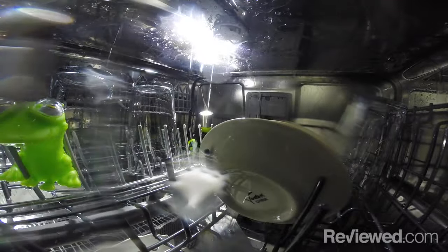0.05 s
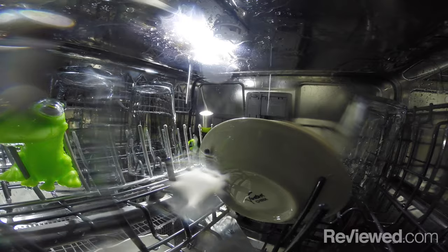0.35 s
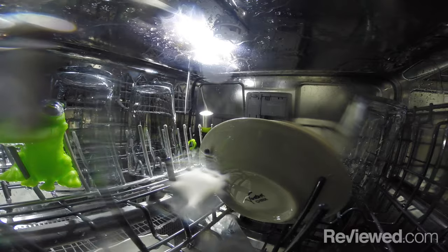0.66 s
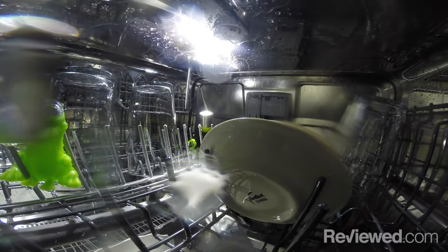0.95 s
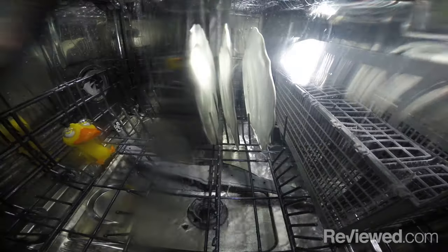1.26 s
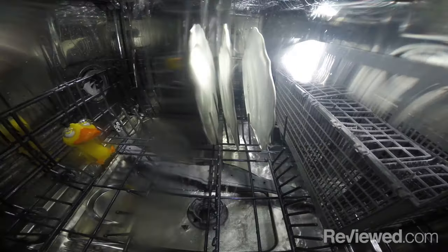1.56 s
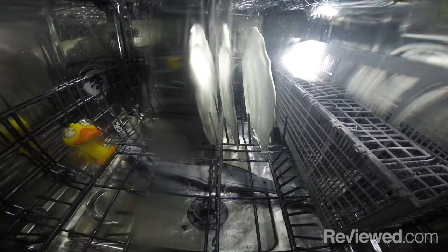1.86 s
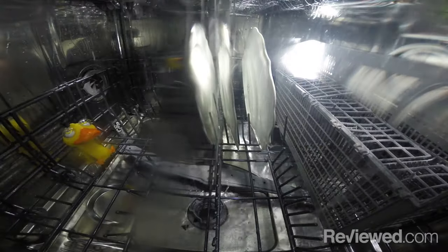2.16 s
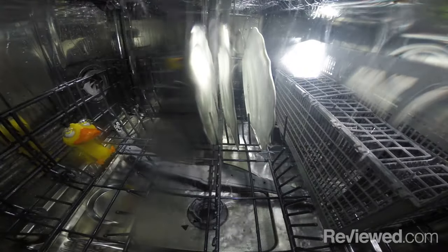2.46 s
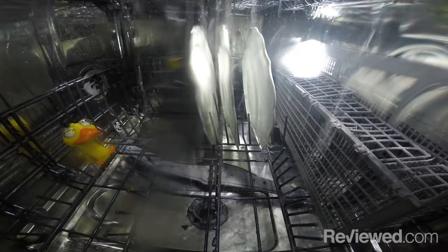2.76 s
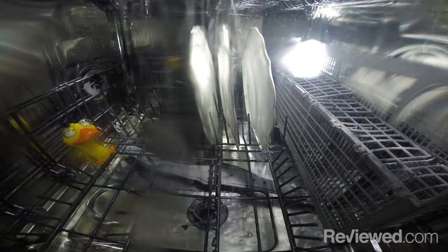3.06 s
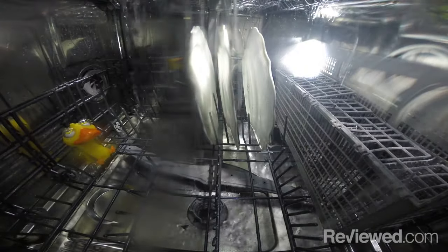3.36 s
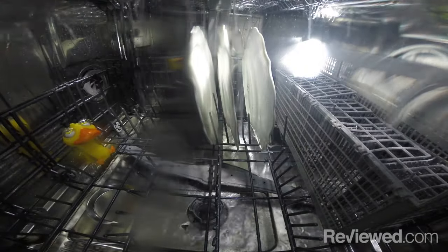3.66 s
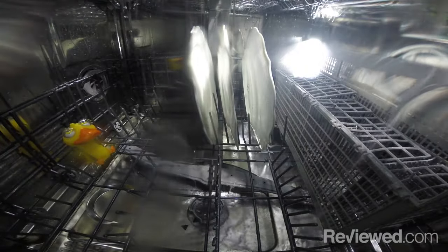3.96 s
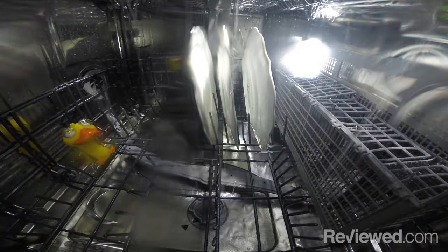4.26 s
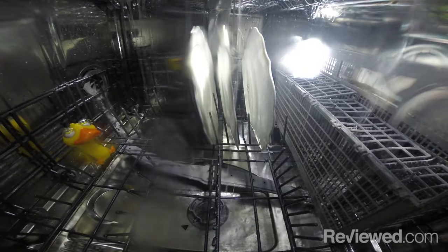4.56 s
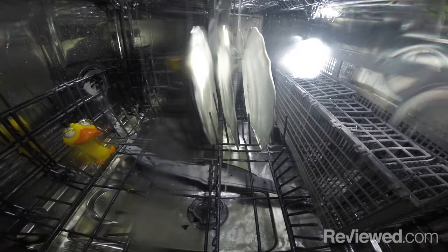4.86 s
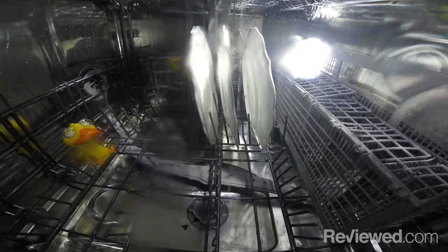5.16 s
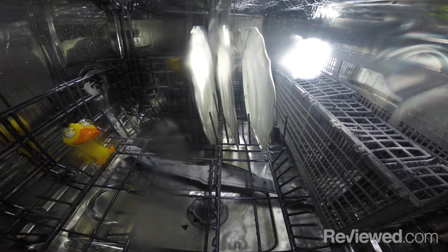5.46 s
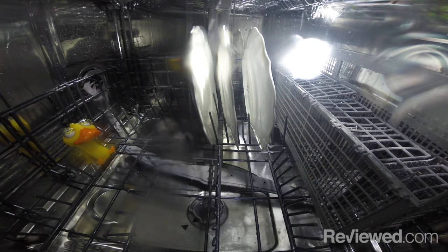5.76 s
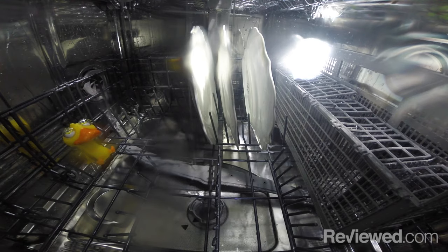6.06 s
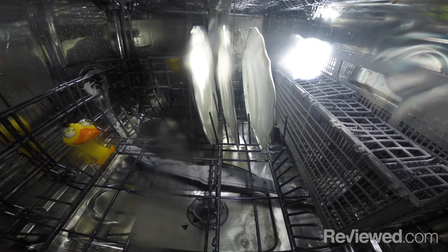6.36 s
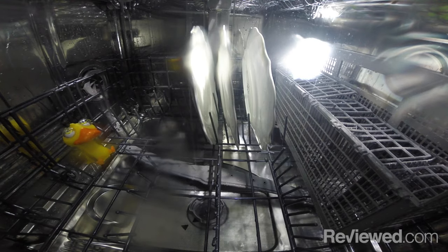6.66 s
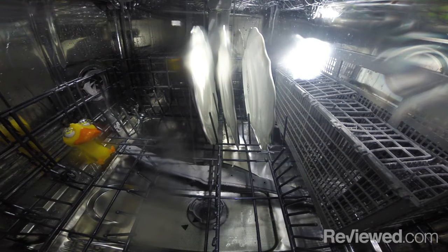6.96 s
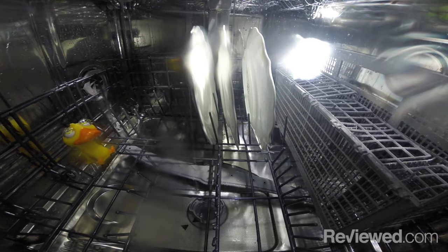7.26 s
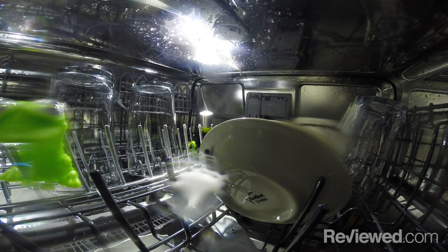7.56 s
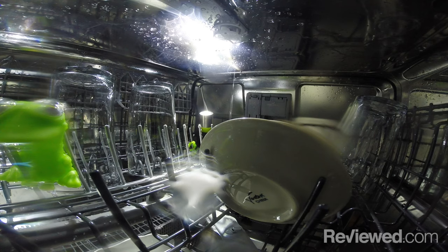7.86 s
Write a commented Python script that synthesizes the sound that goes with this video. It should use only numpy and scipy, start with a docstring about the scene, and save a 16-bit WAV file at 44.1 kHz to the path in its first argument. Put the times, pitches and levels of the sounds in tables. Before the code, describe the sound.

Heard from within a dishwasher's steel tub, pulses of spray thud and rattle against the walls amid fizzy splashes and bright drips. After the strongest run of pulses, the spraying stops and the sound drops to quieter trickling and pattering. Occasional drops plink into standing water with a short metallic ring, while the pump's low drone slowly weakens underneath.

```python
"""Inside a running dishwasher. From the start, jets from the turning spray arm sweep the steel walls and
make them drum and rattle, while thrown water splashes, patters and drips in the ringing tub. At 2.5 s
the jets dig in for their longest volley; from 3.5 s they die away. That leaves trickles, thinning
splashes and a few plinks into the sump over the low, fading drone of the pump."""
import sys
import numpy as np
from scipy import signal
from scipy.fft import rfft, irfft
from scipy.io import wavfile
from scipy.ndimage import uniform_filter1d

SR = 44100
rng = np.random.default_rng(int(sys.argv[2]) if len(sys.argv) > 2 else 0)


def inscribe(sig):
    """Save sig as 16-bit PCM at rate SR to the path in sys.argv[1].

    A 1-D sig is mono; a 2-D sig holds one channel per row.
    Samples are clipped to [-1, 1] before scaling.
    """
    pcm = np.round(np.clip(np.atleast_2d(sig).T, -1, 1) * 32767)
    wavfile.write(sys.argv[1], SR, pcm.astype(np.int16))


N = 353152
TIME = np.arange(N) / SR
JETS_STOP_S, JETS_GONE_S, USUAL_LOAD_DB = 3.5, 4.25, -35

# how hard the jets lean on the nearby walls: (time [s], load [dB])
JET_LOAD = [(0, -34.5), (0.2, -32.5), (0.3, -37.5), (0.57, -38), (0.72, -42), (0.94, -39), (1.15, -49),
            (1.36, -43), (1.63, -37), (1.84, -46.5), (2.0, -40.5), (2.95, -29.5), (3.2, -31.5),
            (3.47, -31.5), (3.67, -48.5), (4.2, -66)]
# even volleys of jet passes: (first pass [s], last pass [s], passes [count], level at usual load [dB])
JET_VOLLEYS = [(0.024, 0.399, 5, -42.5), (0.513, 0.512, 1, -43.5), (0.805, 0.807, 1, -38.5),
               (1.45, 1.612, 2, -43.5), (1.91, 1.909, 1, -38.5), (2.008, 2.169, 3, -37.5),
               (2.275, 2.369, 2, -41), (2.456, 3.481, 14, -43)]
def jet_force(lag_s=0.012, half_width_s=0.022, spread_db=1.3, follows_load=0.68):
    """The driving envelope: each pass of a jet is a quick swell, harder under a higher load."""
    power = np.zeros(N)
    for first, last, passes, db in JET_VOLLEYS:
        for s in np.linspace(first, last, round(passes)):
            swell = np.exp(-np.minimum(((TIME - s - lag_s) / half_width_s) ** 2, 50))
            power += from_db(db + spread_db * rng.standard_normal()) ** 2 * swell
    return np.sqrt(power) * from_db(follows_load * (curve(JET_LOAD) - USUAL_LOAD_DB))


# sub rumble of the cabinet: (frequency [Hz], width [Hz], gain [dB])
CABINET_MODES = [(28.2, 8.6, 1), (64.9, 14, 1.5), (94.2, 17.3, -10)]
# hollow hum of the wall panels: (frequency [Hz], width [Hz], gain [dB])
PANEL_MODES = [(141.5, 12.5, -8), (173.8, 20.6, 4), (181.8, 28.5, 2), (206, 15, -2.5), (225, 40.5, -9.5),
               (254.1, 25, -8), (298.2, 13.1, -15.5)]
# broad thud of a direct hit on the wall: (frequency [Hz], width [Hz], gain [dB])
THUD_MODES = [(57.4, 45, 2), (137.4, 70, -7.5), (279, 73, -7)]
def drumming(force, throb=0.81, soft_hz=235, rumble_db=-38.5, settle_db_per_s=35.5, thud_db=3.5):
    """Jets pound the tub: each pass thuds, the panels hum, and the cabinet rumbles and settles slowly."""
    load_db, run_down_db = curve(JET_LOAD), settle_db_per_s * TIME
    held_db = np.maximum.accumulate(load_db + run_down_db) - run_down_db  # instant attack, slow release
    rumble = from_db(rumble_db + 0.93 * (held_db - USUAL_LOAD_DB))
    pressure = np.interp(TIME, [JETS_GONE_S - .4, JETS_GONE_S], [1, 0])
    mean_force = uniform_filter1d(force, SR // 8) + from_db(-56)
    beat = steady(1 + throb * force / mean_force, span_s=0.17)
    cabinet = steady(body(impacts(per_s=900, spread_db=2.0), CABINET_MODES), span_s=0.064)
    soften = signal.butter(4, soft_hz, fs=SR, output="sos")
    soft_drops = signal.sosfilt(soften, impacts(per_s=700, spread_db=0))
    panels = steady(body(soft_drops, PANEL_MODES), span_s=0.11)
    thud = steady(body(impacts(per_s=1000, spread_db=-0.5), THUD_MODES), span_s=0.095)
    hum = from_db(load_db - 1.14) * beat * panels
    return pressure * (rumble * cabinet + hum) + from_db(thud_db) * force * thud


# metallic mids of the steel under a jet: (frequency [Hz], width [Hz], gain [dB])
STEEL_MODES = [(406, 1130, -34), (457.2, 46.5, 2.5), (540, 69, -31), (703, 95, -8), (894, 180, -16),
               (1084, 99, -10), (1300, 120, -18), (1675, 190, -12.5), (2080, 56, -15), (2460, 180, -18),
               (3180, 150, -18.5)]
def jet_rattle(force, stray_db=-21.5):
    """A jet is a stream of hard drops on steel; stray spray fills the gaps between passes."""
    stray = from_db(stray_db + curve(JET_LOAD)) * np.interp(TIME, [JETS_STOP_S, JETS_GONE_S], [1, 0])
    rattle = steady(body(impacts(per_s=1200, spread_db=-4.5), STEEL_MODES), span_s=0.01)
    return rattle * np.hypot(from_db(-6.0) * force, stray)


# big gouts on dishes and racks: (time [s], fizz level [dB], fizz centre [Hz], gulp level [dB])
BIG_GOUTS = [(0.0774, -36, 5450, -55), (0.4125, -43.5, 4400, -36.5), (0.445, -38, 4860, -54),
             (0.698, -38.5, 4840, -75), (0.848, -39.5, 4370, -53), (0.9316, -38, 5140, -66),
             (1.3758, -37.5, 5150, -52.5), (1.514, -39.5, 5960, -62), (1.54, -38.5, 4570, -54),
             (1.5953, -40.5, 4550, -65), (1.7241, -38, 4700, -47), (1.9733, -49, 4560, -40.5),
             (2.0428, -31.5, 4560, -41.5), (2.3218, -43, 5630, -69), (2.797, -37.5, 5530, -70),
             (3.2444, -40.5, 4750, -60.5), (3.3752, -39, 5240, -63), (3.4326, -39.5, 5160, -48),
             (3.6011, -37.5, 3600, -41.5), (3.66, -45, 4300, -43), (3.7066, -46, 5400, -45.5),
             (3.7405, -41.5, 5250, -54), (3.897, -40, 4030, -60), (3.932, -39, 4970, -62),
             (4.1131, -45, 5300, -57), (4.2113, -47, 5630, -49), (4.3232, -52, 5300, -50),
             (4.4104, -51.5, 7760, -59), (4.7165, -45, 5140, -53), (4.8022, -46, 4460, -59),
             (4.9454, -48.5, 3620, -49.5), (5.0709, -43.5, 5550, -62), (5.3327, -49, 4800, -44.5),
             (5.446, -58, 3630, -49.5), (5.7694, -72, 6090, -52.5), (6.1036, -50, 4730, -51.5),
             (6.3173, -50.5, 4800, -66), (6.8447, -54, 5600, -49), (6.9003, -46.5, 4050, -49.5),
             (7.7614, -52, 4400, -52.5)]
def splashes(gouts, t60=0.046, width_share=0.4, gulp_hz=2680, gulp_width_hz=1000, crack_db=-21):
    """A gout slaps down with a crack and a gulp, and bursts into a short fizz of tiny bubbles."""
    out, t = np.zeros(N), TIME[:SR // 3]
    for s, db, hz, gulp_db in gouts:
        burst = rng.standard_normal(len(t)) * from_db(-60 * t / t60)
        crack = from_db(crack_db) * resonate(burst, 7200, 4300)
        fizz = body(burst, [(hz, width_share * hz, 0)])
        gulp = body(burst, [(gulp_hz, gulp_width_hz, 0)])
        slap = from_db(db) * peak_one(fizz + crack) + from_db(gulp_db + 1.5) * peak_one(gulp)
        add(out, s - .001, tub(slap, wet_db=4.0, t60=0.26))
    return from_db(1.5) * out


# drips into standing water: (time [s], level [dB], bubble pitch [Hz])
DRIPS = [(0.2659, -35, 2080), (0.411, -36.5, 2380), (0.625, -36.5, 2080), (1.1208, -35, 2080),
         (1.1677, -44, 2080), (1.9335, -37, 2080), (1.9789, -46, 2080), (3.0205, -33.5, 2140),
         (3.776, -51, 1000), (4.1686, -47, 1170), (5.0314, -43.5, 2380), (5.1325, -32.5, 2070),
         (5.1617, -42.5, 1105), (5.2904, -43.5, 1027), (5.3293, -35.5, 2410), (7.631, -44, 1110),
         (7.7109, -47.5, 1104), (7.7785, -50, 2420)]
# glasses and plates ringing in sympathy: (frequency [Hz], width [Hz], gain [dB])
DISH_MODES = [(1074, 5.2, 13), (1232, 3.7, 20.5), (2090, 16, 11), (2230, 10, -6), (2410, 5.9, 16.5)]
def plinks(cycles=3.04, rise=0.008, t60_at_1khz=0.29, tap_db=-14):
    """A drop taps the water and traps a ringing bubble; the dishes answer, and low notes hang longer."""
    bubbles, drips, t = np.zeros(N), np.zeros(N), TIME[:SR // 3]
    for s, db, hz in DRIPS:
        age = t * hz / cycles
        swell = (age * np.exp(1 - age)) ** 2
        bend = 1 + rise * np.tanh(age - 1)
        bubble = from_db(db) * swell * np.sin(2 * np.pi * hz * t * bend)
        tap = resonate(rng.standard_normal(len(t)) * np.exp(-age), hz, hz)
        drip = bubble + from_db(db + tap_db) * peak_one(tap)
        add(bubbles, s - .001, bubble)
        add(drips, s - .001, tub(drip, wet_db=0, t60=t60_at_1khz * (1000 / hz) ** 0.89))
    dishes = sum(from_db(db) * resonate(bubbles, hz, width) for hz, width, db in DISH_MODES)
    return from_db(1.1) * (drips + dishes)


# heavy drops on the tub floor: (time [s], level [dB])
FLOOR_KNOCKS = [(1.127, -33), (1.163, -38), (1.406, -37.5), (6.659, -38.5)]
def knocks(t60=0.0095):
    """A heavy drop lands on sheet steel with a short, dull tap."""
    out, t = np.zeros(N), TIME[:SR // 3]
    for s, db in FLOOR_KNOCKS:
        burst = rng.standard_normal(len(t)) * from_db(-60 * t / t60)
        tap = body(burst, [(885, 710, -1.8), (1710, 620, -0.22)])
        add(out, s, from_db(db) * tub(peak_one(tap), wet_db=2.5, t60=0.28))
    return from_db(-4.5) * out


# fader ride for the water in the air: (time [s], level [dB])
AIRBORNE_FLOW = [(0.0, -63), (0.18, -67.5), (0.49, -68.5), (1.38, -68), (1.76, -72), (2.18, -68),
                 (3.3, -69), (3.54, -65.5), (3.74, -66), (4.14, -72.5), (4.97, -72), (5.17, -70.5),
                 (5.46, -74), (6.26, -77.5), (6.79, -76), (8.0, -76.5)]
def flow_swing():
    """How far the thrown water swells above or sinks below its mean, in dB."""
    db = curve(AIRBORNE_FLOW)
    return db - db.mean()


def small_splashes(per_s=5, spread_db=3, low_hz=3980, high_hz=6800):
    """Small gouts land at loosely even times, their fizz riding the flow."""
    jitter, size, pitch, gulp = rng.random((200, 4)).T
    s = (np.arange(len(jitter)) + jitter) / per_s
    fizz_db = -50 + 0.91 * np.interp(s, TIME, flow_swing()) + spread_db * (2 * size - 1)
    hz = low_hz * (high_hz / low_hz) ** pitch
    gulp_db = -56.5 + spread_db * (2 * gulp - 1)
    gouts = np.column_stack([s, fizz_db, hz, gulp_db])[s < TIME[-1]]
    return splashes(gouts, width_share=0.32, gulp_width_hz=980)


# fader ride for the run-off into the sump: (time [s], level [dB])
TRICKLE_LEVEL = [(0, -57.5), (0.7, -57.5), (1.6, -64), (3.1, -56), (3.8, -59.5), (4.4, -62.5), (4.7, -59.5),
                 (5.25, -56), (5.55, -62), (7.0, -63), (8.0, -63.5)]
# EQ for the burbling trickle, bright patter and airy mist: (frequency [Hz], gain [dB])
TRICKLE_EQ = [(300, -11), (600, -4), (850, -7), (1150, -2), (1400, -3.5), (1650, -3.5), (1900, -5.5),
              (2400, 4.5), (2850, -4), (3250, -15), (4000, -1)]
PATTER_EQ = [(2500, -14), (3300, -9), (3900, -8.5), (4300, -6.5), (4650, 1), (5050, -14), (5600, -1),
             (6200, -3.5), (6900, -14.5), (8500, -66)]
MIST_EQ = [(5500, -16), (7200, -1.5), (8200, -7), (9300, -8.5), (10300, -9.5), (11300, -13), (12500, -13.5),
           (15000, -17.5)]
def falling_water(patter_db=-63.5, mist_db=-70.5):
    """The wet bed: run-off trickles, drops patter and mist fizzes, all thinning once the jets stop."""
    swing_db = flow_swing()
    density = np.interp(TIME, [JETS_STOP_S, 5.6], [1, .4])
    trickle = droplets(900 * density, (483, 3380), spread_db=2.5, cycles=9.2,
                       wet_db=5.5, wash_db=-8.5, pitches=15)
    patter = droplets(800 * density, (3510, 7600), spread_db=5.0, cycles=18,
                      wet_db=2.5, wash_db=-7.0, pitches=12)
    mist = droplets(800 * density, (6900, 14400), spread_db=6.0, cycles=17,
                    wet_db=4, wash_db=-2.0, pitches=6)
    return (from_db(curve(TRICKLE_LEVEL)) * steady(colour(trickle, TRICKLE_EQ), span_s=0.81)
            + from_db(patter_db + swing_db) * steady(colour(patter, PATTER_EQ), span_s=0.2)
            + from_db(mist_db + 1.58 * swing_db) * steady(colour(mist, MIST_EQ), span_s=0.55))


def droplets(per_s, band_hz, spread_db, cycles, wet_db, wash_db, pitches, clump_db=2.5):
    """Small drops land in clumps and ring at three spots in the tub; the finest blur into a wash."""
    low_hz, high_hz = band_hz
    clumps = from_db(clump_db * rms_one(uniform_filter1d(rng.standard_normal(N), SR // 40)))
    clicks = impacts(per_s * clumps, spread_db)
    pitch_index = rng.integers(0, pitches, N)
    rings = [resonate(clicks * (pitch_index == k), hz, hz / cycles)
             for k, hz in enumerate(np.geomspace(low_hz, high_hz, pitches))]
    drops = sum(tub(sum(rings[spot::3]), wet_db, t60=0.17) for spot in range(3))
    wash = resonate(rng.standard_normal(N), np.sqrt(low_hz * high_hz), high_hz - low_hz)
    return rms_one(drops) + from_db(wash_db) * rms_one(wash)


# the pump eases off as the water drains: (time [s], level [dB])
PUMP_LEVEL = [(3.8, -47), (4.8, -54.5), (5.3, -53), (6.0, -55.5), (7.0, -56.5), (8.0, -59)]
# EQ for its dark drone: (frequency [Hz], gain [dB])
PUMP_EQ = [(18, 0), (27, 3.5), (47, -11.5), (62, -6), (105, -16), (120, -11), (150, -18), (181, -6.5),
           (210, -18.5), (315, -18), (370, -25), (460, -20.5), (600, -33), (900, -36)]
# faint electrical whine: (frequency [Hz], rms level [dB])
WHINE_TONES = [(8780, -86), (11719, -88), (14626, -89)]
def pump():
    """The pump churns water under the tub. Apart from it, a thin steady whine sits far above everything."""
    churn = steady(colour(rng.standard_normal(N), PUMP_EQ), span_s=0.27)
    whine = sum(np.sqrt(2) * from_db(db) * np.sin(2 * np.pi * hz * TIME) for hz, db in WHINE_TONES)
    return from_db(curve(PUMP_LEVEL)) * churn + whine


def tub(x, wet_db, t60):
    """Tight steel reverb: close walls send back dense reflections, different for every spot."""
    t = TIME[:SR // 2]
    echoes = rng.standard_normal(len(t)) * from_db(-60 * t / t60) * (t > .002)
    return x + from_db(wet_db) * signal.oaconvolve(x, echoes / np.linalg.norm(echoes))[:len(x)]


def impacts(per_s, spread_db):
    """Drops as random clicks: most near unit size, a few louder (softer if spread_db is negative)."""
    out = np.zeros(N)
    at = np.flatnonzero(rng.random(N) < per_s / SR)
    sizes = np.minimum(rng.standard_exponential(N)[at], 4)
    out[at] = from_db(spread_db * sizes) * np.sign(rng.random(N)[at] - .5)
    return out


def body(x, modes):
    """Steep-sided resonances in parallel, with alternating polarity."""
    return sum((-1) ** k * from_db(db) * resonate(resonate(x, hz, width), hz, width)
               for k, (hz, width, db) in enumerate(modes))


def resonate(x, hz, width_hz):
    """A two-pole resonance with unity gain at its peak."""
    r = np.exp(-np.pi * width_hz / SR)
    poles = [1, -2 * r * np.cos(2 * np.pi * hz / SR), r * r]
    return signal.lfilter(np.array([1, 0, -1]) * (1 - r * r) / 2, poles, x + 1e-18)


def colour(x, eq):
    """Apply an EQ curve that rolls off steeply past its ends."""
    hz, db = np.transpose(eq)
    log_f = np.log(np.fft.rfftfreq(N, 1 / SR) + 1)
    beyond = np.abs(log_f - np.clip(log_f, np.log(hz[0]), np.log(hz[-1])))
    return irfft(rfft(x) * from_db(np.interp(log_f, np.log(hz), db) - 60 * beyond), N)


def steady(x, span_s):
    """A leveller: holds unit power over span_s and lets faster detail through."""
    size = max(int(span_s * SR), 64)
    power = uniform_filter1d(uniform_filter1d(x ** 2, size), size)
    return x / np.sqrt(np.abs(power) + 1e-12)


def add(out, s, sound):
    """Mix a short sound in at time s."""
    i = max(round(s * SR), 0)
    out[i:i + len(sound)] += sound[:N - i]


def curve(rows):
    """Automation: straight ramps between (time [s], value) points."""
    return np.interp(TIME, *np.transpose(rows))


def from_db(db):
    """Decibels to gain."""
    return 10 ** (np.asarray(db) / 20)


def rms_one(x):
    """Normalise to unit power."""
    return x / np.sqrt(np.mean(x ** 2) + 1e-20)


def peak_one(x):
    """Normalise to unit peak."""
    return x / np.abs(x).max()


def scene():
    """Machine and water in mono, heard from one point inside the tub."""
    force = jet_force()
    machine = drumming(force) + jet_rattle(force) + pump()
    water = plinks() + knocks() + falling_water() + splashes(BIG_GOUTS) + small_splashes()
    return (machine + water)[None]


def record(dry, cutoff_hz=15200):
    """A steep low-pass takes off the very top."""
    return signal.sosfilt(signal.ellip(12, .1, 90, cutoff_hz, fs=SR, output="sos"), dry)


dry = scene()
out = record(dry)
inscribe(out)
```